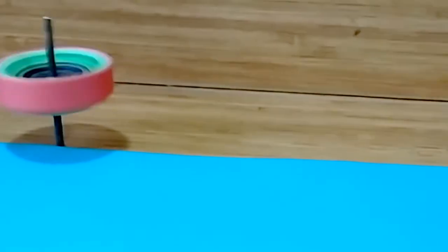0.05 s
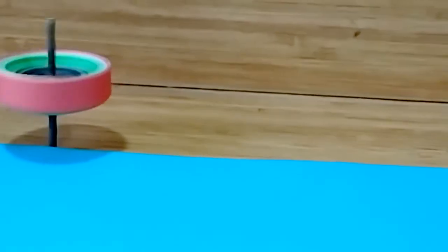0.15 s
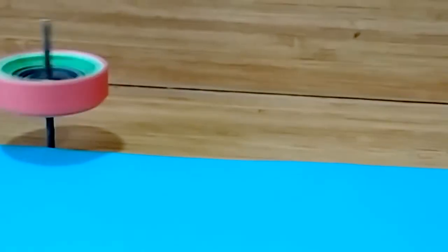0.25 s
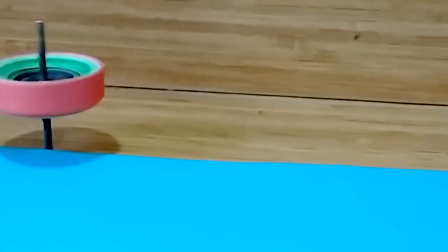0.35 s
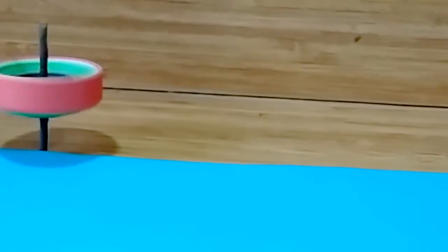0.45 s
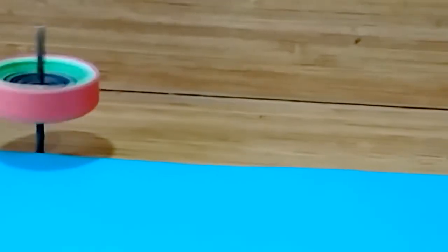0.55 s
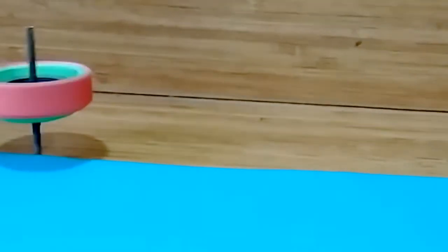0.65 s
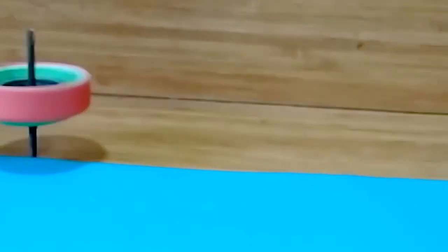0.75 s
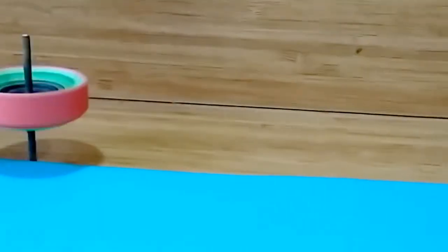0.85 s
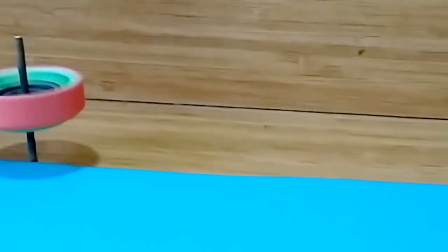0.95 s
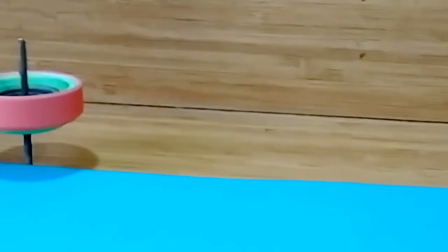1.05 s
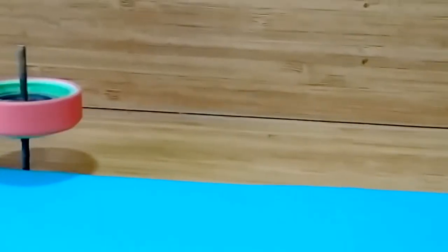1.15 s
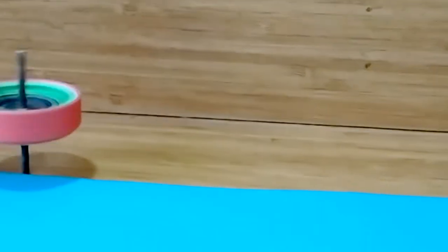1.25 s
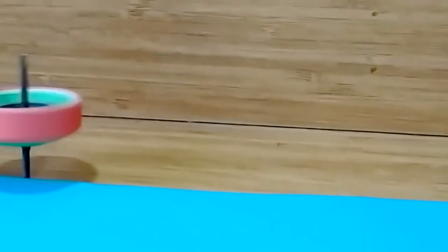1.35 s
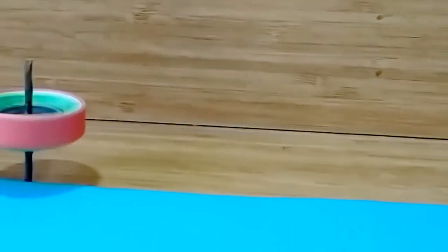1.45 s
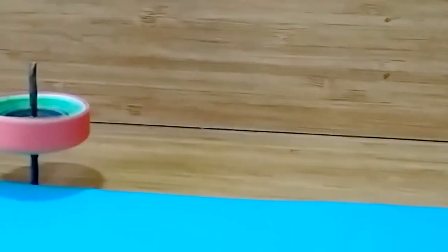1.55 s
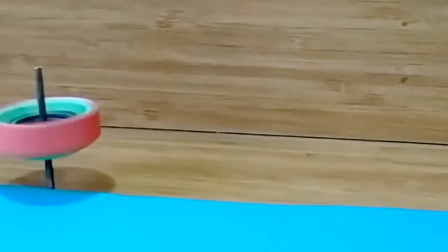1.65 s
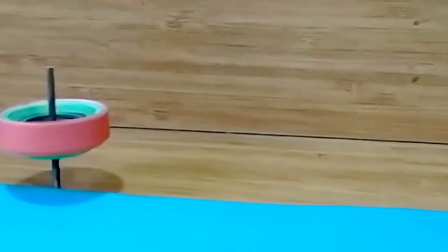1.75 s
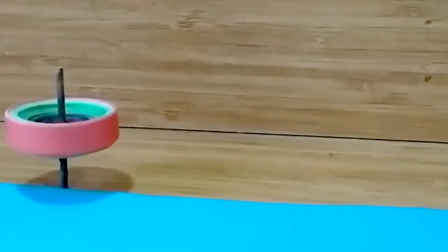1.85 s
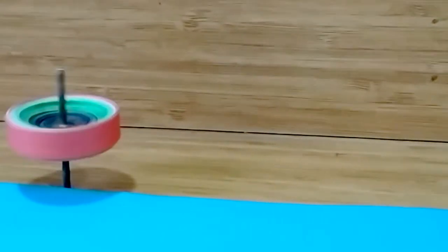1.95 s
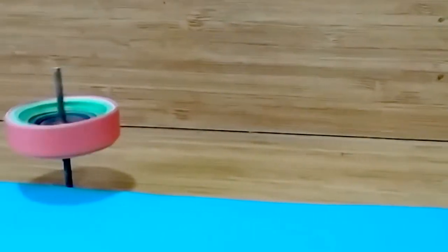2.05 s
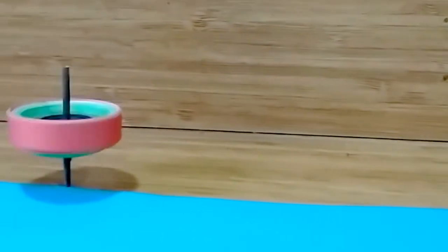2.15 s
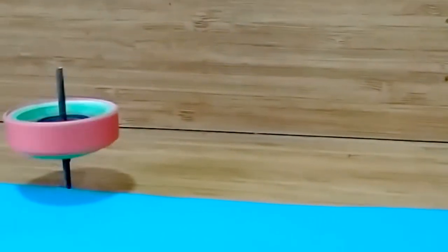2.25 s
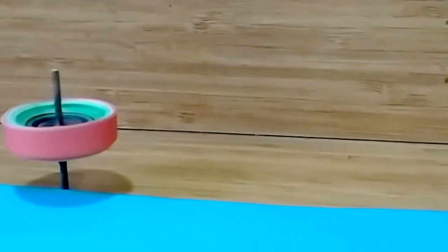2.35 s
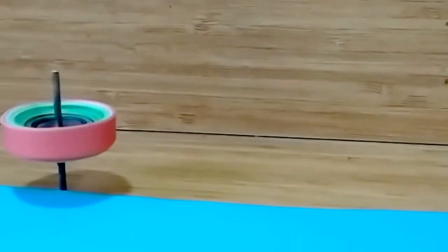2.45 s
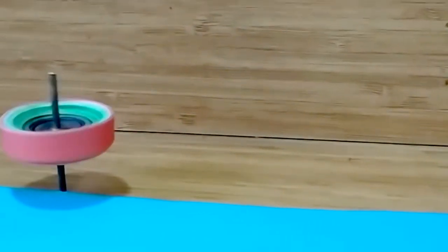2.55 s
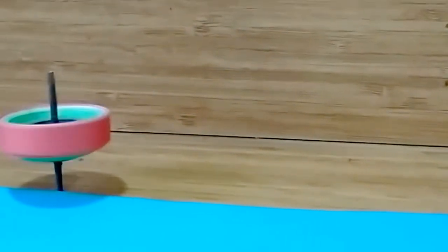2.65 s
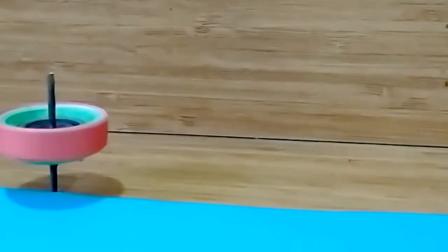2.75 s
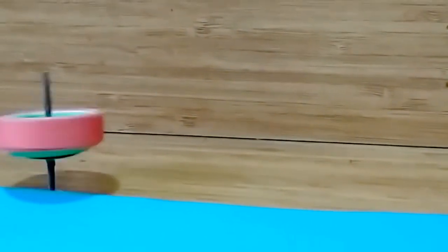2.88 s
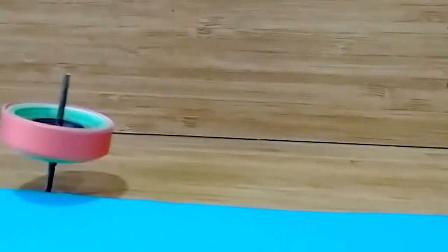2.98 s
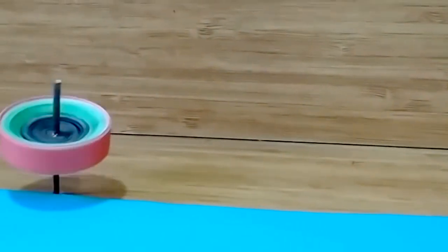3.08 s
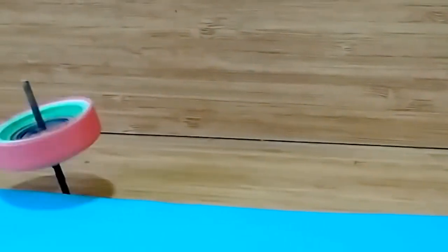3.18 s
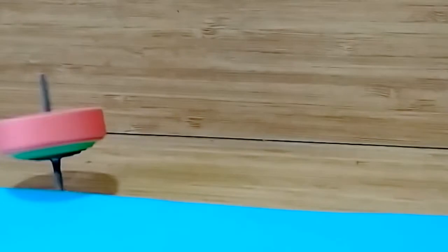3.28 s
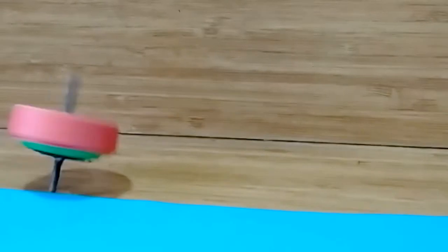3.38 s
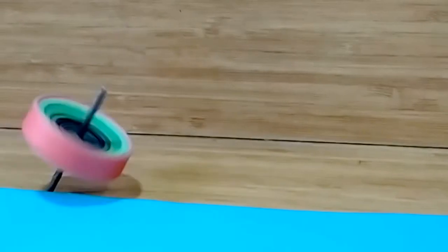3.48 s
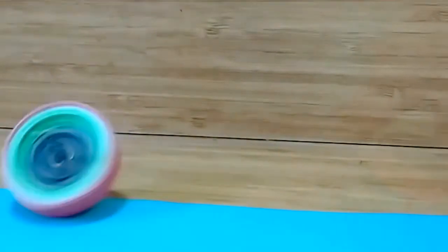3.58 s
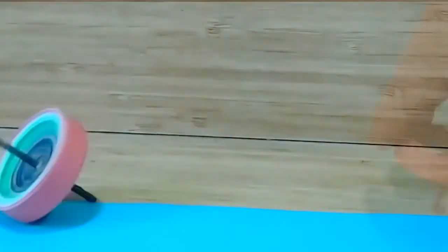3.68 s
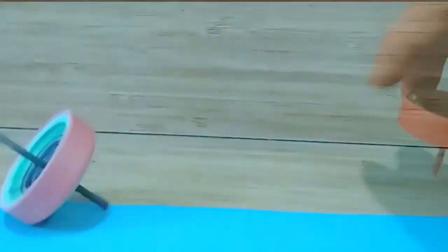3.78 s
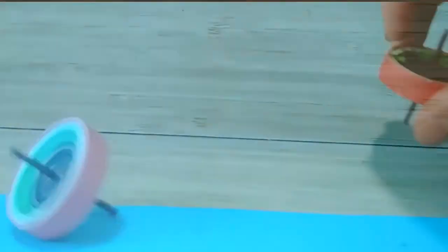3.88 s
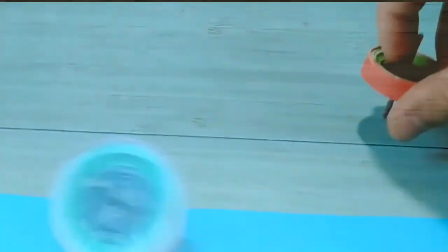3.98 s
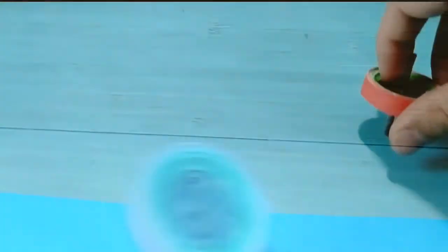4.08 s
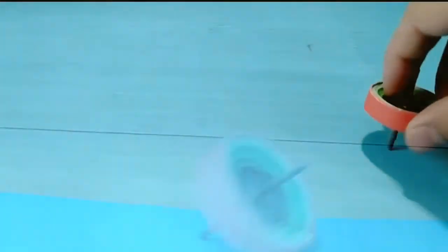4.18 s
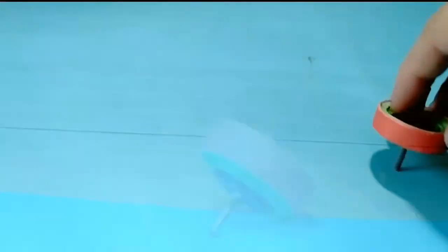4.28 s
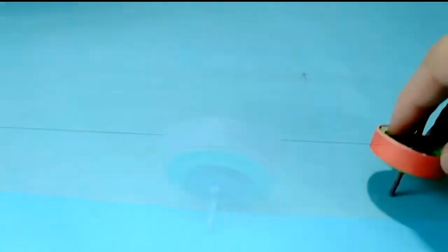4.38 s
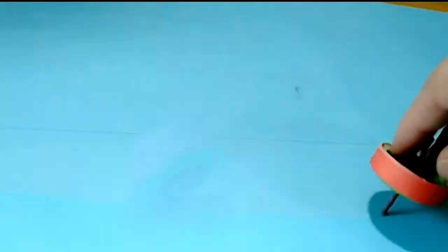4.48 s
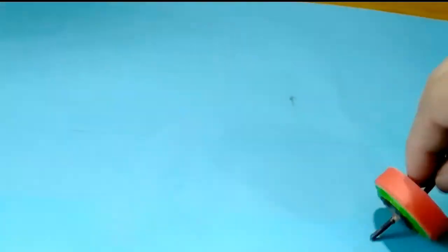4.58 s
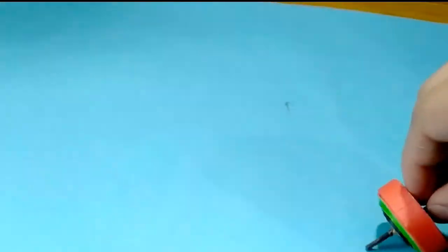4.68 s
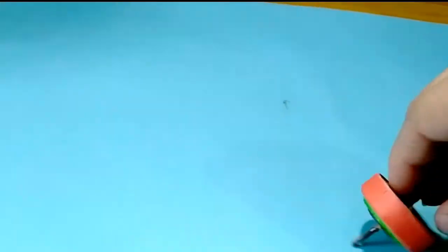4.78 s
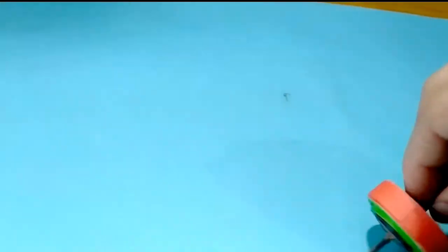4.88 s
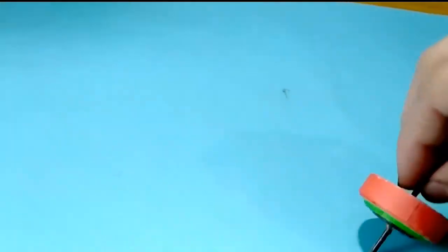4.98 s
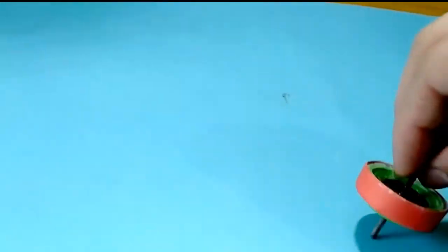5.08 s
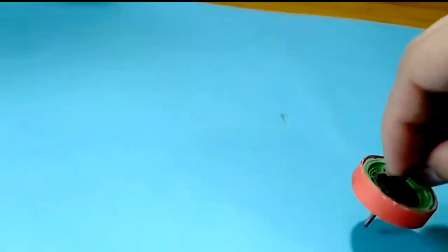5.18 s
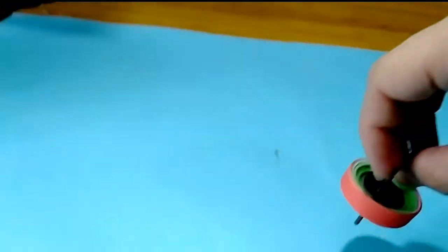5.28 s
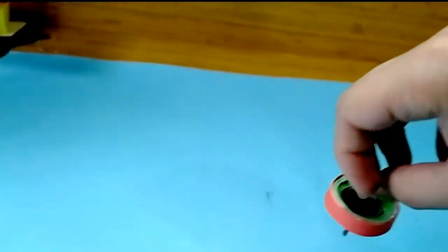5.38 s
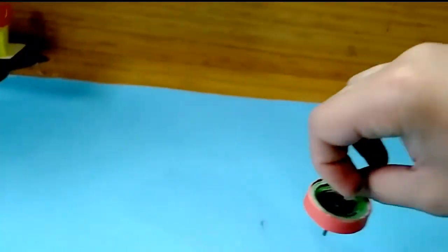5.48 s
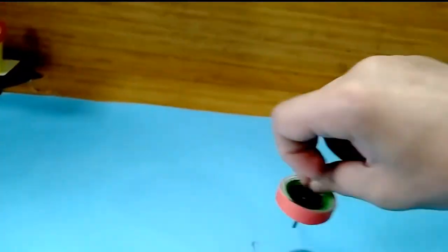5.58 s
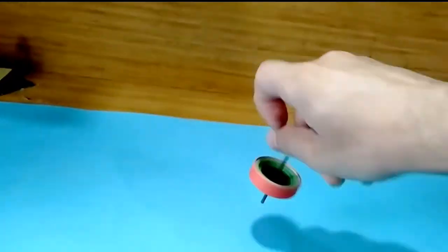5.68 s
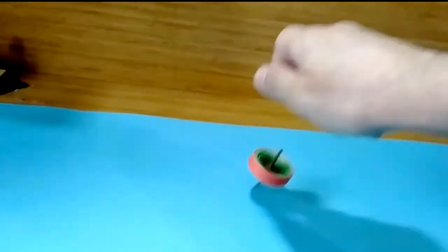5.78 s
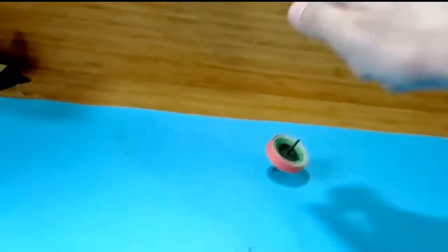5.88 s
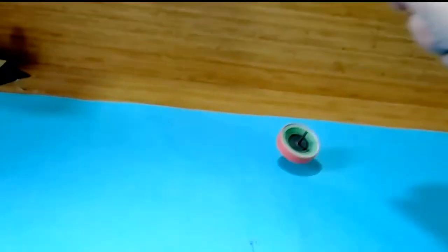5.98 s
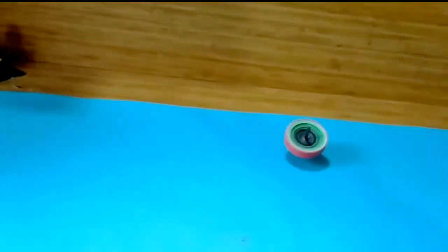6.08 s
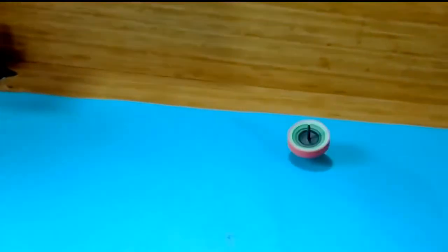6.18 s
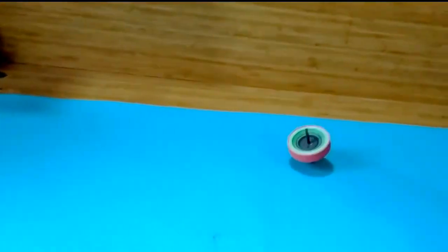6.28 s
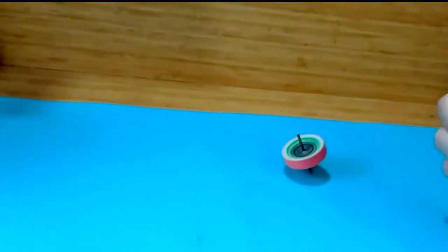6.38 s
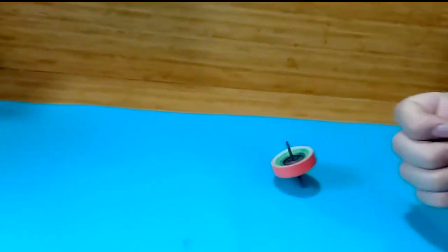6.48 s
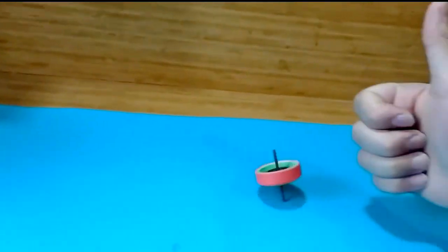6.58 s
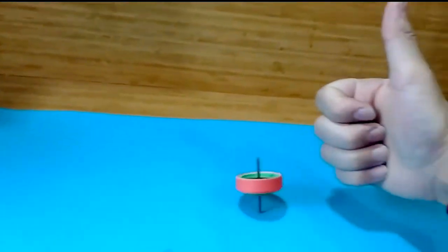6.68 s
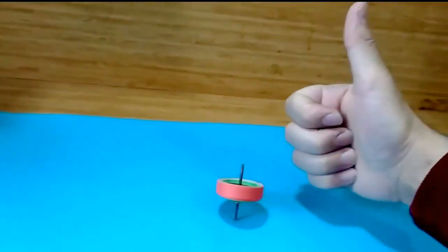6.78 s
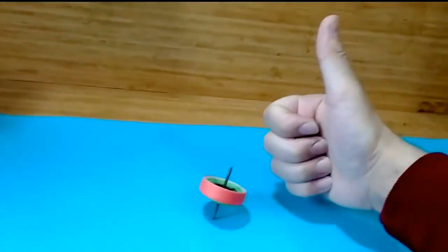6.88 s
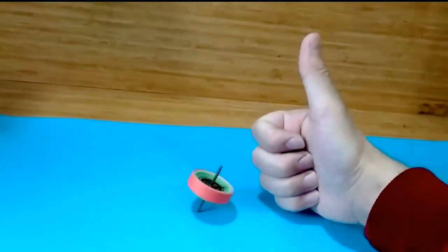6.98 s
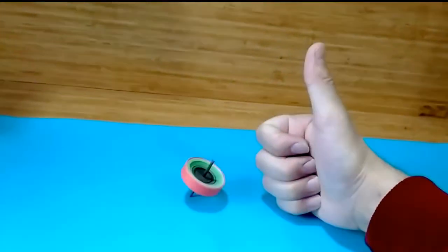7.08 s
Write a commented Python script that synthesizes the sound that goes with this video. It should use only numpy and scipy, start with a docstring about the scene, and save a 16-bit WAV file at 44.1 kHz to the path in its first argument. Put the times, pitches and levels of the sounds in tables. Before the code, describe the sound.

Close microphone, small quiet room. Very quiet irregular ticks from a spinning paper top come roughly a dozen a second, then pause and return with board knocks as it wobbles. Its rim clatters and rasps on the card. After dull thumps and dry finger rubs, a second top strikes the board hard, by far the loudest moment, bounces once and settles into a fast, fluttering low whirr that dies away.

```python
"""Quiet room, wooden table: two small paper tops on a sheet of card, close to the microphone.
First top: its stem ticks as it slips once a turn; it leans, rumbles, falls and scrapes along on its paper rim.
Then fingers rub, click and thump as they set up the second top and flick it.
It drops on the table, bounces and whirrs on its tip, drumming the board once a turn.
Ticks and rubs are grainy coloured noise; knocks, booms and hums come from damped board modes."""
import sys
import numpy as np
from scipy import signal
from scipy.fft import rfft, irfft
from scipy.io import wavfile
from scipy.ndimage import uniform_filter1d

SR = 44100
rng = np.random.default_rng(int(sys.argv[2]) if len(sys.argv) > 2 else 0)


def transcribe(signal):
    """Save signal, clipped to [-1, 1], as a 16-bit WAV file at the path in sys.argv[1]."""
    frames = np.atleast_2d(signal).T
    limited = np.clip(frames, -1, 1)
    pcm = np.round(limited * 32767).astype(np.int16)
    wavfile.write(sys.argv[1], SR, pcm)


N = 314874
T = np.arange(N) / SR
RING_T = T[:SR // 2]  # time axis of every ringing response
TOP_HZ = 15600  # upper limit of the sound


def undb(db):
    """Decibels to gain."""
    return 10 ** (np.asarray(db) / 20)


def gains(table):
    """Each dB column of a curve as a gain per sample, silent outside its span."""
    s, *columns = np.transpose(table)
    inside = 1. * ((T >= s[0]) & (T <= s[-1]))
    gate = uniform_filter1d(inside, size=400)
    return [gate * undb(np.interp(T, s, column)) for column in columns]


def envelope(start_s, length_s, attack_s, release_s):
    """Rise, hold to the end of the length, then die away."""
    rise = np.clip((T - start_s) / attack_s, 0, 1)
    return rise * np.exp(-np.clip(T - start_s - length_s, 0, 1) / release_s)


def unit(x):
    """Scale to rms 1."""
    return x / np.sqrt(np.mean(x ** 2))


def peak(x):
    """Scale to peak 1."""
    return x / np.abs(x).max()


def even(x):
    """Hold the rms near 1 from moment to moment."""
    power = uniform_filter1d(np.mean(x ** 2, axis=0), size=2400)
    return x / np.sqrt(power + 1e-12)


def band(x, hz, kind, order=2):
    """Butterworth filter."""
    sos = signal.butter(order, np.minimum(hz, SR / 2 - 1), kind, fs=SR, output="sos")
    return signal.sosfilt(sos, x)


def slow_noise(hz, kind="low", size=N):
    """Filtered noise of rms 1, for wavering levels and pitches."""
    return unit(band(rng.standard_normal(size), hz, kind))


def colour(x, points):
    """Give x a spectrum of (Hz, dB) points."""
    hz, db = np.transpose(points)
    f = np.fft.rfftfreq(x.shape[-1], 1 / SR)
    gain = undb(np.interp(np.log(f + 1), np.log(hz), db))
    return irfft(rfft(x) * gain, x.shape[-1])


def noise(size, wide_hz=900):
    """Stereo noise: alike in both ears in the bass, unrelated in the treble."""
    mid, side = rng.standard_normal((2, size))
    side = band(side, wide_hz, "high", order=1)
    return np.array([mid + side, mid - side])


def pan(x, db):
    """Make the left channel louder than the right by db."""
    return x * undb(np.array([[db], [-db]]) / 2)


def add(out, s, x):
    """Mix x in at time s."""
    i = max(int(s * SR), 0)
    out[:, i:i + x.shape[1]] += x[:, :max(N - i, 0)]


def through(x, response):
    """Pass x through a stereo impulse response."""
    return signal.fftconvolve(np.atleast_2d(x), response, axes=1)[:, :N]


# How far out of step the board's waves reach the two ears.
# Each row: frequency in Hz, phase between the ears in rad.
EARS_APART = [(120, .15), (280, 0.2), (520, 0.85), (740, 1.42), (900, 1.16), (1400, 2.3), (2500, 0.96)]


def ears(hz):
    """Phase at each ear: the board's waves reach the two ears out of step by an amount that changes with pitch,
    as the table gives."""
    return np.interp(hz, *np.transpose(EARS_APART)) * np.array([[.5], [-.5]])


def ring(modes, rise_s):
    """Impulse response of damped modes; they build up as bending waves spread, with alternating signs."""
    out = 0
    for k, (hz, db, t60) in enumerate(modes):
        fade = np.exp(-np.log(1000) * RING_T / t60)
        out = out + (-1) ** k * undb(db) * np.sin(2 * np.pi * hz * RING_T + ears(hz)) * fade
    return out * (1 - np.exp(-RING_T / rise_s))


def bending_wave(hz, length_s):
    """The first short wave packet that runs from a bump straight through the board."""
    t = RING_T - 1.516 * length_s
    return np.exp(-(t / length_s) ** 2) * np.sin(2 * np.pi * hz * t + ears(hz))


def friction(points, grain_db, grain_hz):
    """Paper fibres catching and letting go: noise in tiny bursts of uneven size."""
    catch = slow_noise(grain_hz)
    return unit(colour(noise(N) * undb(grain_db * catch), points))


def rasp(points, grain_db, grain_hz):
    """Friction whose colour keeps changing: fibres of each size catch on their own."""
    edges = np.geomspace(400, TOP_HZ, 9)
    hiss, out = noise(N), 0
    for low, high in zip(edges, edges[1:]):
        catch = slow_noise(grain_hz)
        out = out + band(hiss, [low, high], "band", order=3) * undb(grain_db * catch)
    return unit(colour(out, points))


def ticks(events, points, snap_s, tail_s, tail_db, rise_s, scratch_db, grain_db):
    """Each contact drags for a moment, scratching at its own pitch, then dies away in a papery rustle."""
    out, t = np.zeros((2, N)), T[:SR // 4]
    margin = SR // 100  # silence around each tick, so that its colouring does not wrap round
    for s, db, length_s, hz in events:
        after = np.maximum(t - length_s, 0)
        decay = np.exp(-after / snap_s) + undb(tail_db) * np.exp(-after / tail_s)
        shape = decay * (1 - np.exp(-t / rise_s))
        catch = slow_noise(600, size=len(t))
        drag = noise(len(t)) * shape * undb(grain_db * catch)
        drag = np.pad(drag, ((0, 0), (margin, margin)))
        scratch = band(drag, [hz / 1.16, hz * 1.06], "band")
        tick = unit(colour(drag, points)) + undb(scratch_db) * unit(scratch)
        add(out, s - margin / SR, undb(db) * peak(tick))
    return out


# The quiet of the room. Each row: frequency in Hz, relative level in dB per Hz.
QUIET = [(12, -32), (20, 7.5), (41, -3.5), (92, -7), (153, -10), (306, -19.5), (352, -18), (465, -17),
         (811, -27.5), (2210, -32), (3080, -37.5), (5850, -41), (8640, -36.5), (11100, -51.5), (15500, -53)]
# Colour of the brighter hiss. Each row: frequency in Hz, relative level in dB per Hz.
HISS = [(12, -41), (20, 0), (56, 0), (112, -23), (202, -18), (266, -15.5), (382, -20.5), (452, -30.5),
        (581, -25.5), (725, -26), (834, -31), (1630, -26.5), (7310, -30), (10800, -21.5), (15500, -41.5)]
# The hiss comes up with the second top. Each row: time in seconds, relative level in dB.
HISS_LEVEL = [(4.3, -81.5), (4.45, -83.5), (5.3, -83.5), (5.8, -72.5), (6.05, -76), (7.14, -75.5)]


def background():
    """Quiet room rumble, and a brighter hiss that enters at 4.3 s and swells towards 5.8 s."""
    quiet = undb(-70) * unit(colour(noise(N, wide_hz=80), QUIET))
    hiss = colour(noise(N, wide_hz=40.04), HISS)
    hiss /= np.std(band(hiss, 9660, "high"))
    treble = band(hiss, 6800, "high", order=1)
    return quiet + gains(HISS_LEVEL)[0] * (undb(7.0) * treble + undb(6.5) * (hiss - treble))


# The board under the first top. Each row: mode in Hz, relative level in dB, t60 in seconds.
BOARD_EDGE = [(107, -46, 0.2), (187, -21.5, 0.13), (234, -11.5, 0.26), (299.9, -2, 0.18), (349.3, -8, 0.13),
              (376.6, -9.5, 0.085), (453, -5, 0.11), (506, -12.5, 0.19), (611, -4.5, 0.062),
              (705.6, -5, 0.076), (822, -3, 0.041)]


def edge_board():
    """Response of the board under the first top."""
    return ring(BOARD_EDGE, rise_s=0.00017)


# Board modes kept humming by the leaning top. Each row: pitch in Hz, waver in Hz, relative level in dB.
HUM = [(299.2, 8.84, 1), (240, 9, -11)]


def hum():
    """Two board modes fed by the rolling tip; they waver, swell and sink, and beat against each other."""
    out = 0
    for hz, waver_hz, db in HUM:
        pitch = hz + waver_hz * slow_noise(28.0)
        swell = undb(1.2 * slow_noise([6, 16], "band"))
        out = out + undb(db) * swell * np.sin(2 * np.pi * np.cumsum(pitch) / SR)
    return unit(out)


# The first top rumbles harder whenever it leans, most as it falls.
# Each row: time in seconds, relative rumble level in dB.
LEAN = [(0.0, -85), (0.42, -73), (0.6, -72.5), (0.69, -58), (0.78, -85), (0.88, -64), (1.1, -65.5),
        (1.28, -61.5), (1.48, -83), (1.85, -76), (1.95, -62), (2.15, -72), (2.95, -84), (3.02, -59),
        (3.22, -62.5), (3.31, -67), (3.38, -58.5), (3.9, -50), (4.08, -61), (4.17, -64), (4.45, -73)]
# It bears down on its tip and the board hums. Each row: start in seconds, length in seconds, relative level in dB.
SWAYS = [(1.146, .12, -73), (1.31, 0.027, -58.5), (2.999, 0.073, -67.5), (3.153, .035, -55.5),
         (3.228, 0.019, -56.5), (3.325, .035, -56), (3.367, 0.022, -50), (3.461, 0.025, -53),
         (3.558, 0.066, -53.5), (3.652, 0.06, -53), (3.792, 0.043, -57), (3.878, 0.034, -50.5),
         (4.034, 0.036, -52.5)]
# The fallen top trundling on its rim. Each row: time in seconds, level in dB.
TRUNDLE = [(3.8, -97), (3.88, -68), (4.0, -63.5), (4.06, -53), (4.14, -73.5), (4.23, -63), (4.35, -84)]


def first_top_rumble():
    """The rolling tip shakes the board unevenly, its modes hum at each sway, and the fallen top trundles."""
    push = colour(rng.standard_normal(N), [(200, 3.5), (300, 2), (450, -5.5), (800, -13.5), (1600, -8)])
    rough = even(through(push, edge_board()))
    lean = gains(LEAN)[0]
    uneven = undb(2.5 * slow_noise([6, 22], "band"))
    sway = sum(undb(db) * envelope(s, length, attack_s=0.011, release_s=.036) for s, length, db in SWAYS)
    rolling = undb(-8.5) * lean * uneven * rough
    humming = sway * (.78 * hum() + .3 * rough)
    bass = unit(band(noise(N), [80, 190], "band"))
    return rolling + humming + (gains(TRUNDLE)[0] + undb(-21.5) * lean) * bass


# Stem of the first top slipping on the card. Each row: time in seconds, relative peak level in dB,
# length in seconds, pitch of the scratch in Hz.
SLIPS = [(0.07, -69, .003, 7950), (0.2544, -67, 0.0033, 8300), (0.3197, -52, 0.007, 7340),
         (0.396, -55.5, 0.005, 8400), (0.476, -64, .004, 8400), (0.538, -55, 0.0087, 7300),
         (0.625, -64.5, .005, 7400), (0.802, -70, .003, 8240), (0.841, -57, 0.009, 7360),
         (0.9226, -52, 0.0047, 9270), (0.999, -54, 0.0032, 7630), (1.076, -56.5, 0.0075, 9600),
         (1.151, -53.5, 0.0099, 8400), (1.226, -52, 0.0066, 7160), (1.304, -54, 0.0065, 7700),
         (1.931, -56, 0.005, 7600), (2.018, -58.5, 0.0039, 8000), (2.244, -53, 0.022, 7800),
         (2.335, -55.5, .004, 7550), (2.495, -51, 0.0096, 8900), (2.831, -59.5, .005, 8800),
         (2.985, -53, 0.021, 8640), (3.067, -55.5, 0.016, 8400), (3.15, -64.5, 0.0049, 7200),
         (3.253, -63.5, 0.0056, 8650), (3.462, -56, 0.023, 8140), (3.488, -57, 0.018, 8050),
         (3.566, -58.5, 0.0053, 8300)]


def tip_hiss():
    """Level of the tip's friction: steady, swelling as it wanders, skidding on after each slip, until it falls."""
    steady = undb(-86)
    wander = undb(-79.5) * np.exp(-((T - 1.786) / 0.19) ** 2)  # centred on 1.786 s
    skid_db = -43.5  # relative to the slip
    skids = sum(undb(db + skid_db) * envelope(s, 0, attack_s=0.0041, release_s=0.072) for s, db, _, _ in SLIPS)
    return (steady + wander + skids) * (T < RIM_HITS[0][0])


# Colour of the slips. Each row: frequency in Hz, relative level in dB per Hz.
SLIP_COLOUR = [(900, -8.5), (2000, -6.5), (3500, -8), (5000, -7), (6300, -5.5), (7500, -1.5), (8800, 3),
               (10000, -7.5), (12000, -15.5), (13500, -32), (16000, -48)]
# Stem of the first top. Each row: mode in Hz, relative level in dB, t60 in seconds.
STEM_MODES = [(4136, -6, 0.062), (7030, 6.5, 0.019), (7500, 5.5, 0.027), (8660, -6, 0.025),
              (9030, -11, 0.031)]


def first_top_tip():
    """The slipping tip scratches the card, rings the stem and hisses on."""
    tip = undb(2.0) * ticks(SLIPS, SLIP_COLOUR, snap_s=0.0071, tail_s=0.015, tail_db=-9,
                            rise_s=0.0012, scratch_db=-14.5, grain_db=3.0)
    for s, db, _, _ in SLIPS:
        # each slip rings the stem's modes in a different mix: only their dB column is varied
        mix_db = np.outer(3 * rng.standard_normal(len(STEM_MODES)), [0, 1, 0])
        stem = peak(ring(np.array(STEM_MODES) + mix_db, rise_s=0.0014))
        add(tip, s + .002, undb(db - 6.5) * stem)
    return tip + tip_hiss() * friction(SLIP_COLOUR, grain_db=3.0, grain_hz=77)


# Light knocks on the board. Each row: time in seconds, relative level in dB,
# relative level of the hard part of the contact in dB.
KNOCKS = [(0.323, -49, -70), (0.402, -58, -83), (0.54, -56, -84), (0.662, -62, -78), (0.844, -53, -73),
          (0.928, -64, -71), (1.001, -52, -69), (1.073, -61, -76), (1.154, -54, -66), (1.229, -45, -78),
          (1.314, -38, -53), (1.569, -58, -76), (1.895, -47.5, -68), (1.932, -56, -78), (2.073, -49, -81),
          (2.249, -42, -61.5), (2.32, -55, -74), (2.481, -59, -69), (2.865, -53.5, -76), (2.99, -40.5, -50),
          (3.156, -40, -56.5), (3.266, -48, -60), (3.371, -54, -58), (3.473, -40.5, -59), (3.575, -43, -60),
          (3.68, -57, -62), (3.866, -33, -61), (3.894, -42, -54), (3.908, -40, -53.5), (3.993, -38.5, -76),
          (4.034, -35, -52), (4.209, -43.5, -58)]


def knocks():
    """A soft push rings the board's low modes, a hard contact the higher ones; each starts with a wave packet."""
    out = np.zeros((2, N))
    board = edge_board()
    for s, db, hard_db in KNOCKS:
        soft = peak(band(board, [150, 420], "band"))
        soft += undb(-8.5) * bending_wave(hz=241, length_s=0.00277)
        hz = rng.uniform(540, 650)
        hard = peak(band(board, [0.897 * hz, 1.137 * hz], "band", order=3))
        hard += undb(-1.5) * bending_wave(hz=hz, length_s=0.00096)
        add(out, s, undb(db - 7.5) * soft + undb(hard_db + 3.5) * hard)
    return out


def lingering_tone():
    """A faint steady tone lingers after one knock."""
    level = undb(-80.5) * envelope(2.3, 0.15, attack_s=0.027, release_s=0.02)
    return level * unit(np.sin(2 * np.pi * 656 * T))


# The paper rim striking and dragging as the first top falls. Each row: time in seconds,
# relative peak level in dB, length in seconds, pitch of the scratch in Hz.
RIM_HITS = [(3.7875, -31, 0.0046, 7730), (3.8125, -32, 0.011, 8400), (3.838, -34.5, 0.0087, 7600),
            (3.851, -39, 0.0047, 7300), (3.858, -32, 0.0074, 8150), (3.894, -34.5, 0.011, 9100),
            (3.912, -39.5, 0.013, 8800), (3.9355, -43, 0.011, 9000), (3.96, -43.5, 0.0061, 8400),
            (3.988, -36, 0.0059, 8800), (4.0317, -40.5, 0.0051, 8600), (4.0552, -45.5, 0.0068, 8460),
            (4.078, -54, 0.0045, 7350), (4.097, -49, 0.0057, 8600), (4.136, -41.5, 0.005, 8400)]
# Colour of the rim. Each row: frequency in Hz, relative level in dB per Hz.
RIM_COLOUR = [(600, -25), (1300, -27), (2280, -20), (2850, -23.5), (4100, -17), (4400, -12.5), (6500, -7.5),
              (7500, -14.5), (8900, 2), (10000, -5.5), (13000, -15.5), (13800, -38), (15500, -50)]
# The leaning, then fallen top sliding on the card.
# Each row: start in seconds, length in seconds, relative level in dB.
SLIDES = [(3.023, 0.024, -70), (3.684, 0.059, -59), (3.785, 0.18, -57.5), (4.054, 0.21, -58),
          (4.284, 0.064, -64)]
# Colour of the sliding. Each row: frequency in Hz, relative level in dB per Hz.
SLIDE_COLOUR = [(600, -37), (1300, -17), (2300, -10.5), (3000, -10.5), (4400, -13), (6500, -12),
                (7500, -1.5), (8700, 0.5), (9800, -5), (13000, -14), (13800, -42), (15500, -55)]


def first_top_rim():
    """The paper rim strikes the card in scratchy ticks and slides along it with a rasp."""
    rim = undb(5.5) * ticks(RIM_HITS, RIM_COLOUR, snap_s=0.0048, tail_s=0.024, tail_db=-13.0,
                            rise_s=0.0003, scratch_db=-1.0, grain_db=-1.5)
    sliding = sum(undb(db) * envelope(s, length, attack_s=0.048, release_s=0.036) for s, length, db in SLIDES)
    rasping = .85 * rasp(SLIDE_COLOUR, grain_db=3, grain_hz=200)
    catching = .5 * friction(RIM_COLOUR, grain_db=8, grain_hz=350)
    return rim + sliding * (rasping + catching)


def first_top():
    """The tip rolls and slips, the leaning top hums on the board, then the rim comes down and slides."""
    return first_top_rumble() + lingering_tone() + pan(first_top_tip(), db=4) + pan(first_top_rim(), db=2.5)


# Finger strokes on the stem. Each row: start in seconds, length in seconds,
# relative level of the rub in dB, relative level of the board's rumble in dB.
STROKES = [(4.603, 0.089, -66, -63), (4.855, 0.075, -60, -53.5), (4.987, 0.028, -73, -69),
           (5.065, 0.075, -67.5, -83), (5.136, 0.047, -63.5, -86)]
# Colour of the rub. Each row: frequency in Hz, relative level in dB per Hz.
RUB_COLOUR = [(500, -6), (1000, -6.5), (1600, -9), (2600, -3.5), (4500, -13.5), (7000, -17.5),
              (10500, -7.5), (13000, -22), (15500, -20)]
# The board under the second top, also played by the thumps, landings and whirr below.
# Each row: mode in Hz, relative level in dB, t60 in seconds.
BOARD_MIDDLE = [(122.8, -11, 0.24), (158.3, -9.5, 0.19), (223, -6.5, 0.11), (290, -4, 0.12),
                (316, -5.5, 0.12), (379, -1, 0.056), (448, -7.5, 0.078), (515, -7, 0.098), (563, -2, 0.061),
                (670, 1, 0.037), (749.4, -0.5, 0.099), (783, -10, .05), (881.3, 6.5, 0.065),
                (916, 1.5, .06), (1022, -5.5, 0.096), (1132, -7, 0.045), (1270, -13.5, 0.13),
                (1438, -8, 0.058)]


def finger_strokes():
    """Fingertips rub the stem and press its tip on the board."""
    attack_s, rub_release_s, press_release_s = 0.018, 0.0034, 0.03
    # the hand holds the tip on the board, which rumbles faintly
    rub, press = 0, undb(-72) * envelope(4.1, 1.44, attack_s, press_release_s)
    for s, length, rub_db, press_db in STROKES:
        rub = rub + undb(rub_db) * envelope(s, length, attack_s, rub_release_s)
        press = press + undb(press_db) * envelope(s, length, attack_s, press_release_s)
    push = band(rng.standard_normal(N), 440, "low", order=3)
    rubbing = undb(4.5) * rub * rasp(RUB_COLOUR, grain_db=4, grain_hz=200)
    pressing = undb(-4.0) * press * even(through(push, ring(BOARD_MIDDLE, rise_s=0.0015)))
    pressing += undb(-14.0) * press * unit(band(push, [60, 220], "band"))
    return pan(rubbing, db=-4.5) + pressing


# The hand sets the second top on the board. Each row: time in seconds, peak level in dB,
# softness as a cut-off in Hz.
THUMPS = [(4.438, -53, 370), (4.6783, -37.5, 616), (4.917, -37.5, 290)]


def thumps():
    """Dull blows on the hand-damped board: a wave packet, a short ring and a dense thud of weak modes."""
    out = np.zeros((2, N))
    board = ring(BOARD_MIDDLE, rise_s=0.00088) * np.exp(-RING_T / 0.041)  # the hand's weight stills the board
    for s, db, hz in THUMPS:
        thud = noise(len(RING_T)) * (1 - np.exp(-RING_T / 0.0034)) * np.exp(-RING_T / 0.018)
        body = peak(band(board, [120, hz], "band"))
        body += undb(-2.5) * peak(band(thud, [150, hz], "band"))
        body += undb(-8.5) * bending_wave(hz=0.675 * hz, length_s=2 / hz)
        add(out, s, undb(db) * peak(body))
    return out


# Finger clicks and touches of the stem, then sharp ticks as the second top strikes the board and bounces,
# and a last faint tick. Each row: time in seconds, relative peak level in dB, length in seconds, pitch in Hz.
CLICKS = [(4.55, -58, 0.028, 11000), (4.649, -59, .001, 3000), (4.678, -55, .003, 1250),
          (4.873, -47, 0.0053, 5170), (4.888, -64, 0.0018, 2800), (4.9162, -44, 0.001, 11900),
          (4.917, -48, 0.002, 2500), (5.003, -54, 0.0091, 10000), (5.1711, -55, 0.0049, 5440),
          (5.7403, -36.5, 0.0014, 10500), (5.7444, -38.5, .002, 10000), (5.8392, -26.5, 0.0011, 9500),
          (5.9179, -30, 0.0026, 9300), (5.9382, -34.5, .001, 9000), (5.9497, -40.5, .001, 10800),
          (7.0963, -46.5, .001, 10200)]
# Colour of the clicks. Each row: frequency in Hz, relative level in dB per Hz.
CLICK_COLOUR = [(1000, -20.5), (2800, -10), (5000, -13), (7500, -4.5), (10500, -0.5), (12500, -8),
                (15500, -21)]


def clicks():
    """Short bright contacts: fingers clicking, then the second top ticking as it strikes the board and bounces."""
    contacts = undb(6.5) * ticks(CLICKS, CLICK_COLOUR, snap_s=0.0021, tail_s=0.012, tail_db=-6.5,
                                 rise_s=0.00045, scratch_db=-9, grain_db=4.0)
    return pan(contacts, db=-1.0)


def rattle(low_hz, high_hz, fade_s):
    """Many weak modes at once: a dying burst of band noise of peak 1."""
    burst = noise(len(RING_T)) * (1 - np.exp(-RING_T / 0.00045))
    return peak(band(burst, [low_hz, high_hz], "band", order=3) * np.exp(-RING_T / fade_s))


def board_boom():
    """The struck board: strong modes over a rattle of weak ones, a wave packet and a slow bass."""
    boom = peak(ring(BOARD_MIDDLE, rise_s=0.00048))
    boom += undb(-8.5) * rattle(280, 1000, fade_s=0.014)
    boom += undb(-19.0) * bending_wave(hz=159.0, length_s=0.01322)
    boom += undb(-40.5) * peak(ring([(99, 0, 0.18)], rise_s=.008))  # the whole table gives a little
    return boom


# Stem and disc of the second top. Each row: mode in Hz, relative level in dB, t60 in seconds.
TOP_MODES = [(2190, -5, 0.021), (2350, -11, 0.017), (2766, -4.5, 0.029), (2860, -7.5, 0.039),
             (3070, 7.5, 0.011), (3275, -3.5, 0.022), (3670, -4.5, 0.012)]


def top_clack():
    """The top's own stem and disc ring over short and long rattles."""
    clack = peak(ring(TOP_MODES, rise_s=0.00095))
    clack += undb(-7) * rattle(1900, 3900, fade_s=0.0071)
    clack += undb(-22.0) * rattle(2200, 3700, fade_s=0.051)
    clack += undb(-13.5) * rattle(1100, 3800, fade_s=0.001)  # the crack of the contact
    return clack


# The second top dropping and bouncing, then, from 6.11 s, harder taps of its spinning tip.
# Each row: time in seconds, level of the board in dB, level of the top's own clack in dB.
DROP_AND_TAPS = [(5.8408, -10, -15), (5.9217, -17, -36.5), (6.11, -41.5, -69), (6.141, -48, -62),
                 (6.266, -46, -71), (6.388, -50, -65), (6.449, -50.5, -62)]


def drop_and_taps():
    """The top clacks as it drops, bounces and later taps; the board booms a moment after each contact."""
    out = np.zeros((2, N))
    for s, board_db, clack_db in DROP_AND_TAPS:
        add(out, s, undb(clack_db) * pan(top_clack(), db=-7.5))
        add(out, s + 0.00056, undb(board_db) * board_boom())
    return out


# Speed of the second top. Each row: time in seconds, turns a second.
SPIN = [(6.0, 33.3), (6.3, 32.7), (6.62, 32.5), (6.72, 32.2), (6.9, 31.7), (7.14, 30.5)]
# Tones of the uneven tip. Each row: multiple of the turn rate, relative level in dB.
TIP_TONES = [(4, -12), (5, -0.5), (7, -11.5), (8, -9), (9, -4), (10, -6), (11, -12), (12, -7), (14, -16),
             (15, -13), (17, -14.5)]


def tip_profile(turns):
    """Unevenness round the tip repeats every turn as low tones; they waver as the point of contact wanders."""
    out = 0
    for order, db in TIP_TONES:
        wander = .35 * slow_noise(6)
        phase = 2 * np.pi * (order * turns + rng.random()) + wander + ears(order * SPIN[0][1])
        out = out + undb(db) * np.sin(phase)
    return unit(out)


# The second top calms while it stands upright and whirrs again as it swings.
# Each row: time in seconds, relative whirr level in dB.
WHIRR = [(5.98, -52), (6.04, -47.5), (6.14, -43.5), (6.28, -46), (6.37, -55), (6.49, -55), (6.57, -49.5),
         (6.77, -43), (6.9, -48.5), (6.95, -67.5), (7.14, -74)]
# The tip drums hardest late in the spin, as the whirr comes back.
# Each row: time in seconds, strength of each bump in dB.
DRUMMING = [(5.98, -46.5), (6.16, -42.5), (6.3, -45), (6.41, -67), (6.62, -43), (6.72, -39), (6.89, -39),
            (6.96, -66)]
# The rolling tip's push on the board. Each row: frequency in Hz, relative level in dB per Hz.
PUSH_COLOUR = [(70, 6), (125, -1), (161, 3), (195, 6), (230, -12), (305, -2.5), (390, -1.5), (520, -7.5),
               (750, -40), (900, -21), (1300, -9), (2000, -27)]
# Colour of the grinding grit. Each row: frequency in Hz, relative level in dB per Hz.
GRIT_COLOUR = [(800, -10), (1400, 9.5), (2700, 8.5), (4500, -18), (7000, 0.5), (10500, 6), (13000, -37),
               (15500, -26)]


def second_top():
    """The uneven tip rolls without pause, bumps the board once a turn and grinds just after each bump."""
    turns = np.cumsum(np.interp(T, *np.transpose(SPIN))) / SR
    turns -= np.interp(6.7882, T, turns)  # a turn begins at this time in seconds
    beats = np.floor(turns + .014 * slow_noise(30))  # slightly unsteady count of the turns
    bumps = unit(np.diff(beats, prepend=beats[0]) * undb(.8 * rng.standard_normal(N)))
    load = np.exp(-(turns % 1) / .25)  # greatest as each turn begins
    whirr, bump = gains(WHIRR)[0], gains(DRUMMING)[0]

    board = ring(BOARD_MIDDLE, rise_s=0.0033)
    low = colour(rng.standard_normal(N), PUSH_COLOUR)
    rolling = .8 * tip_profile(turns) + .56 * even(through(low, board))
    rolling *= .85 + .6 * uniform_filter1d(load, size=200)

    # the tip's weight damps the higher modes under it
    damped = board * np.exp(-RING_T / .016)
    high = band(bumps + (.15 + 1.1 * load) * rng.standard_normal(N), [380, 950], "band")
    ringing = undb(-20.5) * bump * even(through(high, damped))

    first_wave = 1.05 * bending_wave(hz=660, length_s=.0013)
    direct = undb(-2) * bump * through(bumps / np.mean(bumps[bumps > 0]), first_wave)
    grinding = (.5 + load) * friction(GRIT_COLOUR, grain_db=1.5, grain_hz=150)
    return undb(0.5) * whirr * rolling + ringing + direct + undb(-25.5) * bump * grinding


# A faint high squeak while the second top swings. Each row: time in seconds, pitch in Hz, level in dB.
SQUEAK = [(6.13, 8300, -93), (6.139, 8460, -64), (6.156, 8260, -61), (6.175, 8440, -71), (6.215, 8660, -64),
          (6.245, 8500, -74), (6.275, 8750, -95), (6.305, 8840, -67), (6.345, 8700, -72), (6.39, 8670, -73)]


def squeak():
    """A thin, unsteady high tone that creeps upward."""
    s, hz, db = np.transpose(SQUEAK)
    pitch = np.interp(T, s, hz) + 90 * slow_noise(192)
    level = gains(np.transpose([s, db]))[0]
    return level * np.sin(2 * np.pi * np.cumsum(pitch) / SR)


# Colour of the small room. Each row: frequency in Hz, relative level in dB per Hz.
ROOM_COLOUR = [(80, -27.5), (130, 0.5), (400, -1.5), (900, -4.5), (1600, -1.5), (3000, -10.5), (6000, -6),
               (15000, -12.5)]


def room(x, t60_low_s, t60_high_s, wet_db):
    """A small room: a diffuse tail whose treble dies first."""
    tail = colour(noise(len(RING_T)), ROOM_COLOUR)
    low = band(tail, 640, "low")
    fade = -np.log(1000) * RING_T
    response = low * np.exp(fade / t60_low_s) + (tail - low) * np.exp(fade / t60_high_s)
    response *= 1 - np.exp(-RING_T / 0.011)
    return x + undb(wet_db) * through(x, response / np.sqrt(np.sum(response ** 2) / 2))


def scene():
    """Both tops and the hand in the room."""
    near = first_top() + knocks() + finger_strokes() + thumps() + clicks()
    near += drop_and_taps() + second_top() + squeak()
    return room(near, t60_low_s=0.31, t60_high_s=0.24, wet_db=-14.0) + background()


def record(dry):
    """The recorder cuts the highest treble."""
    return signal.sosfilt(signal.ellip(8, .2, 70, TOP_HZ, fs=SR, output="sos"), dry)


dry = scene()
out = record(dry)
transcribe(out)
```